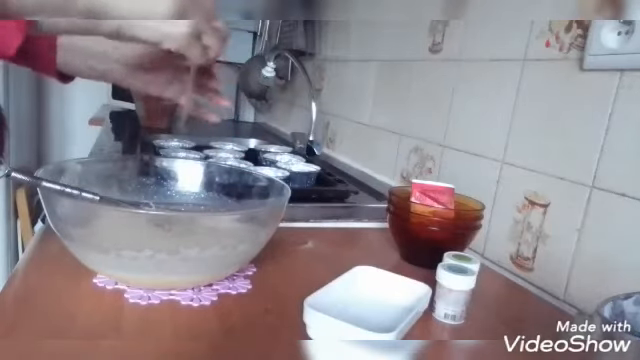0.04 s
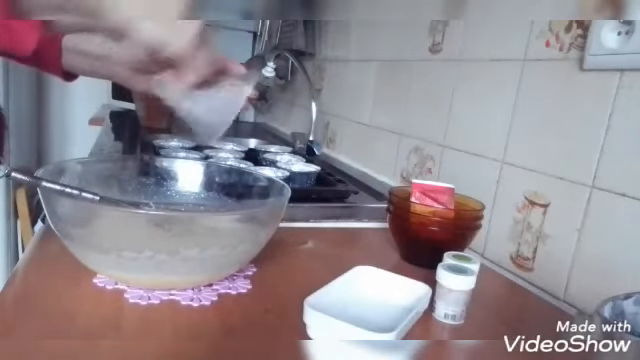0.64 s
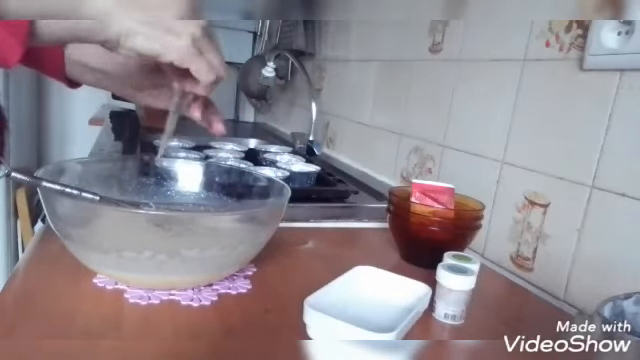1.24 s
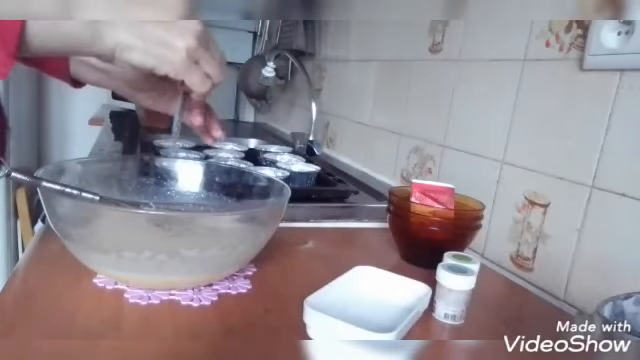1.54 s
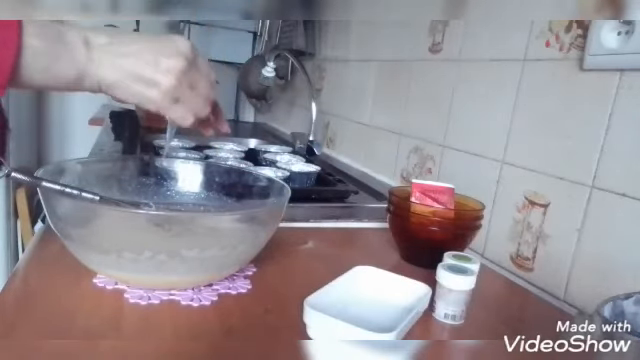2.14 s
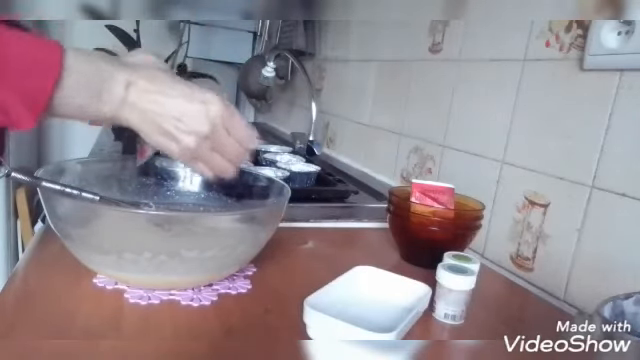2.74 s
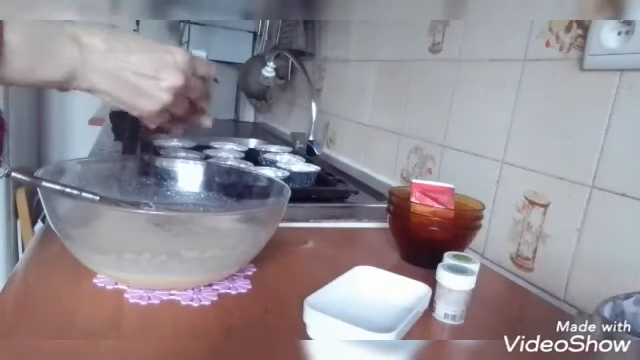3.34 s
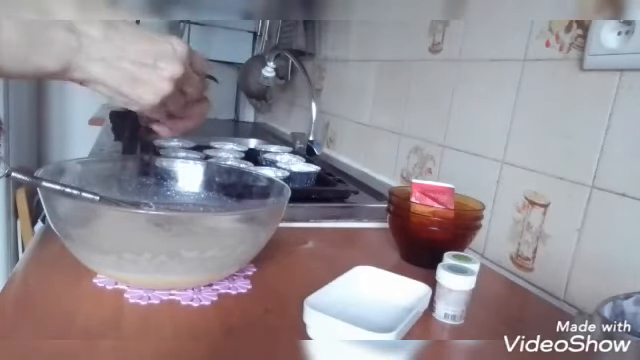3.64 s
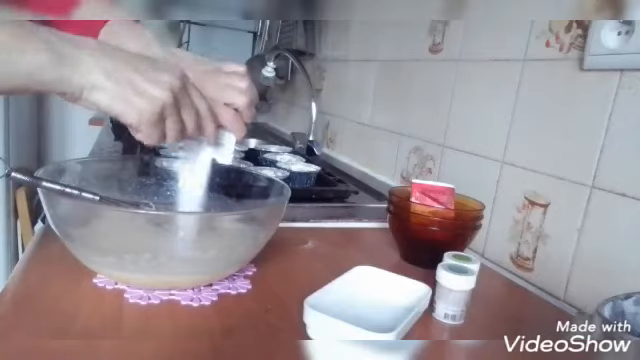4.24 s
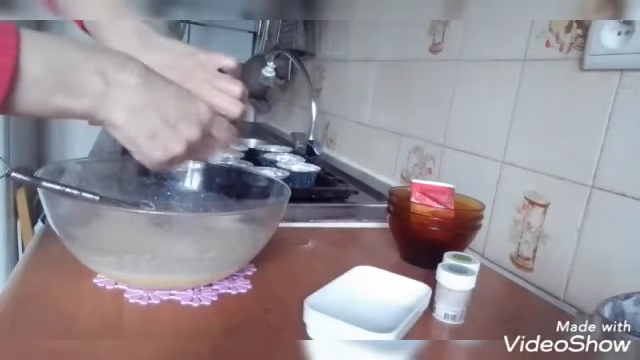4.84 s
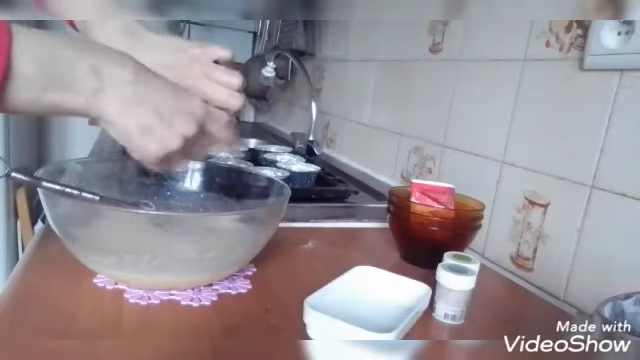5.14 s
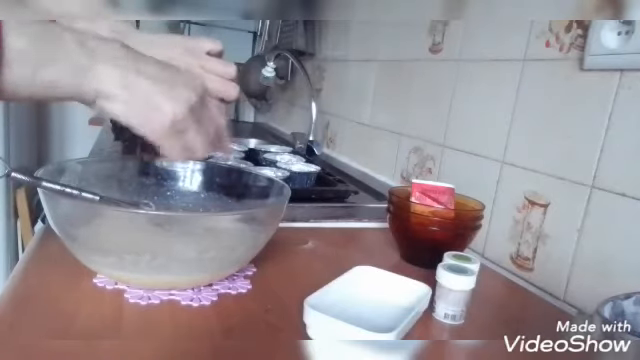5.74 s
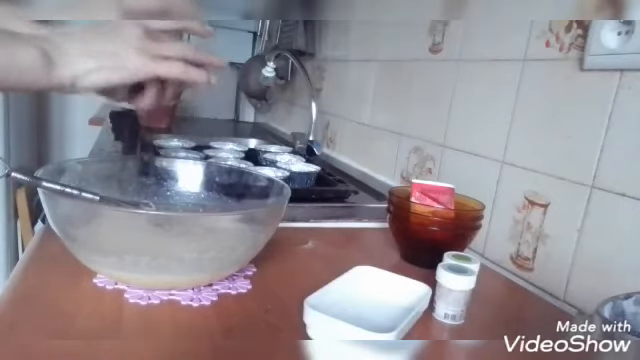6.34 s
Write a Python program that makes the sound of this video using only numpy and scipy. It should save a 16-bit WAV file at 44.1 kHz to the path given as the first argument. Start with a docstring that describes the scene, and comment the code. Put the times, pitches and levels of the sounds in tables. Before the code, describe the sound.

A small paper sachet is shaken and torn open, then fine crystals hiss into a bowl amid dry crinkles.

```python
"""Paper rustles and crystals slosh as a small sachet is shaken down in a tiled kitchen.
Its creases buckle in short clusters of snaps, and fingers knock the packet. Fibres rip as the top is
torn off, fine crystals hiss into a bowl, and the packet is flicked empty.
The hard walls reverberate after each crinkle, over the low hum of an appliance."""
import sys
import numpy as np
from scipy import signal
from scipy.fft import rfft, irfft
from scipy.io import wavfile
from scipy.ndimage import uniform_filter1d

SR = 44100
rng = np.random.default_rng(int(sys.argv[2]) if len(sys.argv) > 2 else 0)


def int16_out(signal):
    """Quantize to a 16-bit WAV file."""
    q = np.round(np.clip(np.atleast_2d(signal).T, -1, 1) * 32767)
    wavfile.write(sys.argv[1], SR, q.astype(np.int16))


N = 282195
T = np.arange(N) / SR


def gain_of(db):
    """Amplitude grows tenfold for every 20 dB."""
    return 10 ** (np.asarray(db) / 20)

def unit_rms(x):
    """Normalisation to unit mean power."""
    return x / np.sqrt(np.mean(x ** 2) + 1e-20)

def curve_at(points, hz):
    """Interpolation on a logarithmic frequency axis."""
    point_hz, value = np.transpose(points)
    return np.interp(np.log(hz + 1), np.log(point_hz + 1), value)

def add(mix, start_s, sound):
    """Superposition: a sound adds to the mix from its start time."""
    part = mix[..., max(round(start_s * SR), 0):][..., :sound.shape[-1]]
    part += sound[..., :part.shape[-1]]

def minimum_phase(points, size=2048):
    """Causality: the Hilbert transform of the log gain sets the phase. Returns frequencies and gains."""
    log_gain = np.log(gain_of(curve_at(points, abs(np.fft.fftfreq(size, 1 / SR)))))
    gains = np.exp(signal.hilbert(log_gain).conj())
    return np.fft.rfftfreq(size, 1 / SR), gains[:size // 2 + 1]

def filtered(x, gains):
    """Convolution with an impulse response of unit energy."""
    taps = irfft(gains)
    lead = len(taps) // 64
    return signal.oaconvolve(x, np.roll(taps, lead) / np.linalg.norm(taps))[lead:][:N]

def swell(peak_s, rise_s, fall_s, hold_s=0):
    """Envelope of a movement: Gaussian rise, hold, exponential decay; rise and fall each span 20 dB."""
    before = np.maximum(peak_s - T, 0) / rise_s
    after = np.maximum(T - peak_s - hold_s, 0) / fall_s
    return 10 ** -np.minimum(before ** 2 + after, 10)

def snaps(samples, per_s, spread_db=2.0):
    """Shot noise: random impulses of either sign, many small and a few large."""
    chance, size, sign = rng.random((3, samples))
    size_db = spread_db * np.minimum(-np.log(1 - size), 4)
    return unit_rms((chance < per_s / SR) * gain_of(size_db) * np.sign(sign - .5))

def friction(strokes, per_s, catch_db):
    """Stick-slip friction: fibres snap as paper catches and slips, driving body, crackle and air bands."""
    power = sum(np.outer(gain_of([db + body_db, db, db + air_db]) ** 2, envelope ** 2)
                for envelope, db, body_db, air_db in strokes)
    catching = unit_rms(uniform_filter1d(rng.standard_normal(N), 260))
    fibres = unit_rms(snaps(N, per_s) * gain_of(catch_db * catching))
    return fibres * np.sqrt(power)

# Each row: peak time in seconds, relative level in dB, rise and fall in seconds, body band offset in dB.
SLIDE_STROKES = [(0, -33.5, .02, .06, -24.5), (.455, -46, 0.073, .05, -14.5), (.8, -31, 0.033, .12, -18),
                 (.9, -32, .04, 0.057, -24), (.965, -31.5, 0.078, 0.04, -25),
                 (1.08, -35.5, 0.049, 0.17, -12), (1.23, -46, 0.13, 0.079, -6),
                 (1.36, -56, 0.038, 0.1, 2.5), (1.46, -57, 0.035, 0.079, -13),
                 (1.7, -51.5, 0.049, 0.028, -18), (1.96, -46, 0.03, 0.061, -19),
                 (3.06, -54.5, .1, 0.65, -21), (3.46, -53, .05, 0.049, -6.5),
                 (4.93, -52.5, 0.04, 0.22, -15), (5.09, -50, 0.11, 0.091, -25),
                 (5.2, -51.5, 0.076, 0.056, -6.5), (5.39, -53, 0.049, 0.089, -28),
                 (5.9, -52.5, 0.017, 0.042, -32), (6.02, -48.5, 0.023, .07, -12.5),
                 (6.24, -41, 0.049, .1, -13), (6.39, -40, .07, .1, -19)]
def handling(settle_db=-17.5, settle_rise_s=0.018, settle_fall_s=0.12, usual_crinkle_db=-28.5):
    """Sliding friction: the paper rustles in the hand and settles after each crinkle."""
    settles, strokes = [], []
    for s, db, _, _ in CREASE_SNAPS:
        body_db = -10.5 - 0.55 * (db - usual_crinkle_db)  # a weaker crinkle settles with a fuller sound
        settles.append((s + settle_rise_s, db + settle_db, settle_rise_s, settle_fall_s, body_db))
    for s, db, rise_s, fall_s, body_db in SLIDE_STROKES + settles:
        air_db = -13 - 0.33 * (body_db + 13)  # limp paper is full and dull, taut paper thin and bright
        strokes.append((swell(s, rise_s, fall_s), db, body_db, air_db))
    return gain_of(-3.5) * friction(strokes, per_s=1600, catch_db=1.3)

# Each row: frequency in Hz, relative spectral density in dB.
PAPER_SPECTRUM = [(120, -45), (250, -30.5), (450, -24.5), (760, -20.5), (1120, -24.5), (2160, -18),
                  (3000, -15.5), (4000, -10.5), (5800, 2), (7060, 4.5), (8400, -3.5), (10400, -15),
                  (15200, -18), (16200, -27)]
def paper(drive, body_hz=3000, air_hz=10000, delay_per_octave_s=0.00051):
    """Radiation from a sheet: panels give the low body, creases the crackle, fibres the high air."""
    hz, colour = minimum_phase(PAPER_SPECTRUM)
    # dispersion: bending waves carry the treble fastest
    delay_s = delay_per_octave_s * np.clip(np.log2(air_hz / (hz + 1)), 0, 2)
    colour = colour * np.exp(-2j * np.pi * np.cumsum(delay_s) * hz[1])
    body = 1 / (1 + (hz / body_hz) ** 6)
    air = 1 - 1 / (1 + (hz / air_hz) ** 16)
    crackle = 1 - body - air
    return sum(filtered(x, colour * band) for x, band in zip(drive, (body, crackle, air)))

def slosh(push, low_hz=650, high_hz=1250, until_s=2.1):
    """Band-limited noise: shaken crystals rush against the sealed sachet's walls with a hollow sound."""
    band = signal.butter(3, [low_hz, high_hz], "band", fs=SR, output="sos")
    bandwidth_gain = np.sqrt(SR / 2 / (high_hz - low_hz))
    return gain_of(-7) * bandwidth_gain * signal.sosfilt(band, push * (T < until_s))

# Each row: frequency in Hz, time to decay by 60 dB in seconds.
REVERB_TIMES = [(200, 0.15), (1000, 0.37), (2500, 0.36), (6500, 0.35), (10000, 0.21), (15000, 0.44)]
# Each row: frequency in Hz, relative level of the reverberation in dB.
REVERB_LEVELS = [(200, -13), (1500, -0.5), (4000, 0), (6700, -1), (10000, 3), (15000, -16)]
def echoes(near_db=-8.0, near_fade_s=0.0032, first_s=.004, count=14000):
    """Impulse response: early reflections off bowl and counter, then tile echoes decaying band by band."""
    taps = np.zeros(SR)
    taps[round(first_s * SR) + rng.integers(0, count * 2, count)] = rng.choice([-1., 1.], count)
    hz, t, bands = signal.stft(taps, SR, nperseg=256)
    decay = gain_of(-60 * t / curve_at(REVERB_TIMES, hz)[:, None])
    decay *= gain_of(curve_at(REVERB_LEVELS, hz))[:, None] / np.linalg.norm(decay, axis=1, keepdims=True)
    tail = signal.istft(bands * decay, SR)[1][:SR]
    tail /= np.sqrt(np.mean(taps[:count] ** 2) * (len(hz) - 1))
    near = rng.standard_normal(SR) * np.exp(-T[:SR] / near_fade_s)
    return tail + gain_of(near_db) * near / np.linalg.norm(near)

def kitchen(x, turns_per_s=1.7, positions=6):
    """Reverberation of a moving source: as the hand moves, one echo pattern fades into the next."""
    place = (T * turns_per_s * positions - np.arange(positions)[:, None]) % positions
    shares = np.sin(np.pi / 2 * np.minimum(place, 2))
    return x + sum(signal.oaconvolve(x * share, echoes())[:N] for share in shares)

# Each row: frequency in Hz, relative spectral density in dB.
ROOM_SPECTRUM = [(25, -25), (70, -18), (100, -8.5), (150, -10), (200, -6.5), (450, -4), (700, -10),
                 (1200, -14), (2500, -14.5), (4200, -16), (6600, -5.5), (8400, -13.5), (12500, -18.5),
                 (16000, -18.5)]
# Each row: centre frequency in Hz, level in dB, width in Hz.
HUM_LINES = [(112.8, -77.5, 4.4), (140.6, -68.5, 11.6), (158.5, -71, 9.1), (291, -75.5, 12),
             (341.6, -74, 7.5), (380, -75.5, 6.9), (441.7, -72.5, 14), (483, -75, 5.7)]
def room_noise_and_hum(room_db=-57.5):
    """Broadband room noise sounds steady; an appliance's hum wavers because its noise bands are narrow."""
    def noise(gains):
        return unit_rms(irfft(rfft(rng.standard_normal(N)) * gains, N))
    hz = np.fft.rfftfreq(N, 1 / SR)
    room = gain_of(room_db) * noise(gain_of(curve_at(ROOM_SPECTRUM, hz)))
    hum_power = sum(gain_of(db) ** 2 / width * np.exp(-(2 * (hz - centre) / width) ** 2)
                    for centre, db, width in HUM_LINES)
    hum_gain = np.linalg.norm(gain_of([db for _, db, _ in HUM_LINES]))
    return room + hum_gain * noise(np.sqrt(hum_power))

# Each row: start in seconds, relative level in dB, body and air band offsets in dB.
CREASE_SNAPS = [(.1316, -36, -9.5, -11), (.1423, -35.5, -11, -9), (.2619, -26.5, -13, -17),
                (.5006, -30.5, -11.5, -10), (.5484, -30.5, -21, -22), (0.5831, -34, -8.5, -12),
                (0.596, -26, -12, -5.5), (.6576, -23, -17, -8), (.6814, -22.5, -32, -10),
                (.6996, -18.5, -26.5, 0.5), (.7976, -20.5, -16, -1.5), (.8109, -31, -24, -1),
                (0.9382, -26.5, -13.5, -15), (0.9532, -21, -19.5, -8), (.967, -18.5, -25, -6.5),
                (1.048, -29, -17, -3), (1.058, -17.5, -20.5, -9), (1.1806, -27.5, -20, -6.5),
                (1.3438, -45, -1.5, -3), (1.8076, -41.5, -3.5, -7), (1.921, -25.5, -21, -7.5),
                (2.2456, -35, -22, -7), (2.2524, -28.5, -15.5, -16), (2.4074, -25.5, -30, -4),
                (2.5611, -27, -19, -11), (2.6863, -23.5, -24, -10), (2.8466, -25.5, -21, -7),
                (3.1632, -27, -15.5, -18), (3.196, -38, -8, -27), (3.258, -33, -26, -23),
                (3.2625, -29.5, -10.5, -16), (3.3638, -35, -10, -24), (3.3963, -28.5, -8.5, -14),
                (3.4327, -36, -6, -27), (3.6499, -33.5, -12, -11), (3.8051, -41, -12.5, -10),
                (4.614, -30.5, -12, -26), (4.6783, -39, -8, -12), (4.7654, -40, -15.5, -7),
                (5.157, -44, -1.5, -7), (5.2214, -52.5, 3, 2), (5.2945, -51, -19, 1),
                (5.3473, -35.5, -4, -21), (5.3534, -30.5, -14.5, -4.5), (5.3677, -30.5, -17, -9),
                (5.4177, -30, -16, -14), (5.562, -32.5, -11, -9), (5.6178, -34.5, -9.5, -13),
                (5.7234, -42.5, -0.5, -4), (5.7342, -35.5, -31, -8), (5.7798, -36, -6.5, -14),
                (6.0729, -38, -18, 0.5), (6.0848, -30.5, -13, -28), (6.15, -33, -15, -11),
                (6.224, -36, -7, -5), (6.2762, -26, -13, -20), (6.307, -17, -21, -11.5),
                (6.3734, -23, -18, -27)]
def crinkles(fade_s=0.0068, air_fade_s=0.034, panel_hz=(2110, 3860), tick_count=16, samples=4096):
    """Buckling: a crease gives way with one snap and a dying avalanche of smaller ones."""
    drive, t = np.zeros((3, N)), T[:samples]
    ticks = [(s, -54.5, -3.5, -6) for s in rng.uniform(0, T[-1], tick_count)]  # faint, under the fingers
    decay = np.exp(-t / fade_s)
    for s, db, body_db, air_db in ticks + CREASE_SNAPS:
        burst = snaps(samples, per_s=6000) * decay
        burst[0] += 2.5  # the opening snap
        burst *= np.linalg.norm(decay) / np.linalg.norm(burst)
        panel = signal.iirpeak(rng.uniform(*panel_hz), Q=6.3, fs=SR)  # flat paper beside the crease rings
        body = gain_of(body_db) * (burst + signal.lfilter(*panel, burst))
        air = gain_of(air_db - 0.5) * burst * np.exp(-t / air_fade_s)  # the first snaps are the brightest
        add(drive, s, gain_of(db - 2) * np.array([body, burst, air]))
    return drive

# Each row: start in seconds, relative level in dB, pitch in Hz, cycles to decay by 1/e.
FINGER_KNOCKS = [(.134, -46, 520, 1.8), (.423, -45.5, 620, 2.8), (.796, -45, 453, 2.3),
                 (1.056, -42, 720, 2.6), (2.848, -40, 390, 2.1), (3.258, -44.5, 730, 9),
                 (3.396, -41.5, 690, 5.5), (4.025, -48, 425, 2.3), (4.614, -46, 346, 2.2),
                 (4.676, -39, 450, 3.2), (4.767, -48.5, 404, 2.2), (4.963, -45.5, 450, 3.1),
                 (5.344, -36.5, 227, 1.6), (5.347, -41, 367, 3.3), (5.556, -46, 361, 2.6),
                 (6.372, -43.5, 530, 2.7)]
def knocks(puff_gain=0.59, low_hz=150, samples=4000):
    """Damped oscillation: a fingertip pops the packet with a puff of air; so small a source lacks bass."""
    pops, t = np.zeros(N), T[:samples]
    for s, db, hz, cycles in FINGER_KNOCKS:
        band = signal.butter(2, [hz / 2, hz * 2], "band", fs=SR)
        puff = puff_gain * unit_rms(signal.lfilter(*band, rng.standard_normal(samples)))
        decay = np.exp(-t * hz / cycles)
        add(pops, s, gain_of(db - 2) * decay * (np.sin(2 * np.pi * hz * t) + puff))
    return signal.lfilter(*signal.butter(4, low_hz, "high", fs=SR), pops)

# Each row: start of the hold and its length in seconds, relative level in dB, rise in seconds,
# body and air band offsets in dB.
TEARING_PULLS = [(2.259, 0.058, -41.5, 0.017, -15, -7.5), (2.422, 0.051, -25.5, 0.037, -18.5, -10),
                 (2.586, 0.053, -29, 0.066, -14, -7), (2.824, 0.024, -28, 0.071, -16.5, -2.5),
                 (2.89, 0.011, -35, 0.018, -8, -9)]
def ripping(release_s=0.063):
    """Fracture, fibre by fibre: each pull builds up, runs along the top edge and lets go."""
    strokes = [(swell(s, rise_s, release_s, hold_s), db, body_db, air_db)
               for s, hold_s, db, rise_s, body_db, air_db in TEARING_PULLS]
    return gain_of(-5) * friction(strokes, per_s=2400, catch_db=1.2)

# Each row: frequency in Hz, relative spectral density in dB.
CRYSTAL_SPECTRUM = [(710, -63), (1200, -27), (1380, -31), (2590, -14), (2830, -13), (4170, -10.5),
                    (7100, 2.5), (10100, -9.5), (14400, -7.5), (16000, -15)]
# The main pour, then the dregs. Each row: peak time in seconds, relative level in dB,
# rise and fall in seconds.
CRYSTAL_GUSHES = [(4.349, -40.5, 0.37, 0.25), (4.74, -48.5, 0.15, 0.57)]
def pour():
    """Granular flow: thousands of tiny impacts on paper and bowl merge into a hiss."""
    grains = snaps(N, per_s=18000, spread_db=1.0)
    power = sum((gain_of(db) * swell(s, rise_s, fall_s)) ** 2 for s, db, rise_s, fall_s in CRYSTAL_GUSHES)
    _, colour = minimum_phase(CRYSTAL_SPECTRUM)
    return gain_of(-0.5) * np.sqrt(power) * filtered(grains, colour)

def scene():
    """Superposition: the sachet and its crystals reverberate in the kitchen, over room noise and hum."""
    rustle = handling()
    rustle_body = rustle[0]
    sachet = paper(crinkles() + rustle + ripping()) + slosh(rustle_body) + knocks()
    return (kitchen(sachet + pour()) + room_noise_and_hum())[None]

def record(dry, cutoff_hz=16000):
    """Band limiting: a linear-phase low-pass filter removes the highest treble."""
    low_pass = signal.firwin(511, cutoff_hz, window=("kaiser", 9), fs=SR)
    return signal.oaconvolve(dry, low_pass[None], "same")


dry = scene()
out = record(dry)
int16_out(out)
```